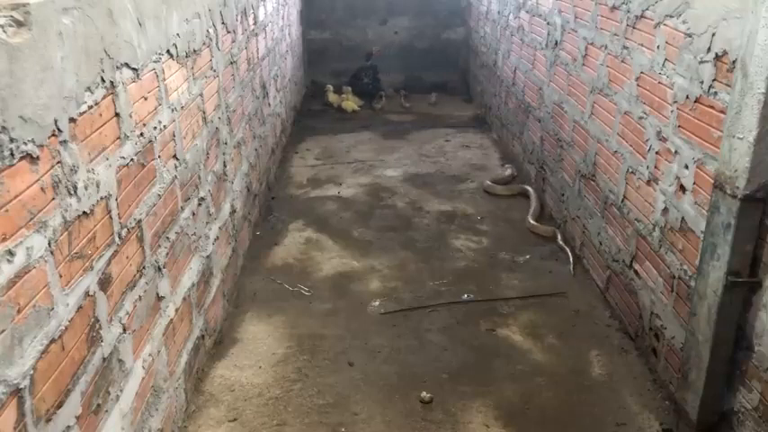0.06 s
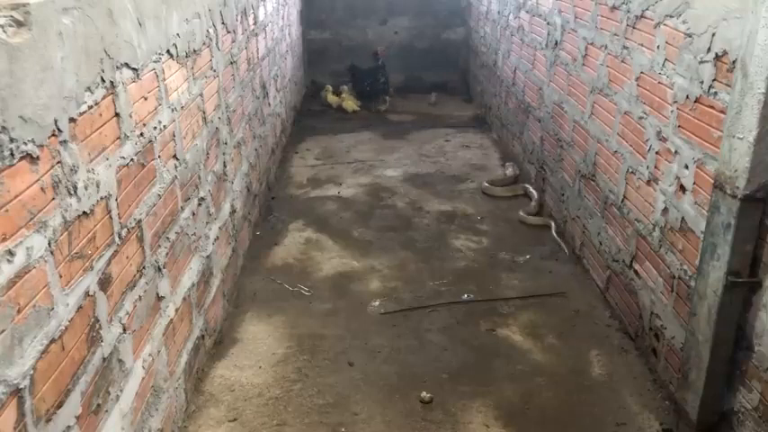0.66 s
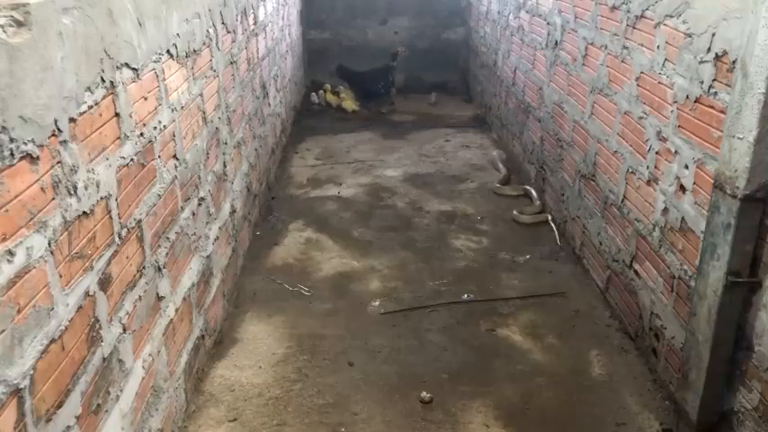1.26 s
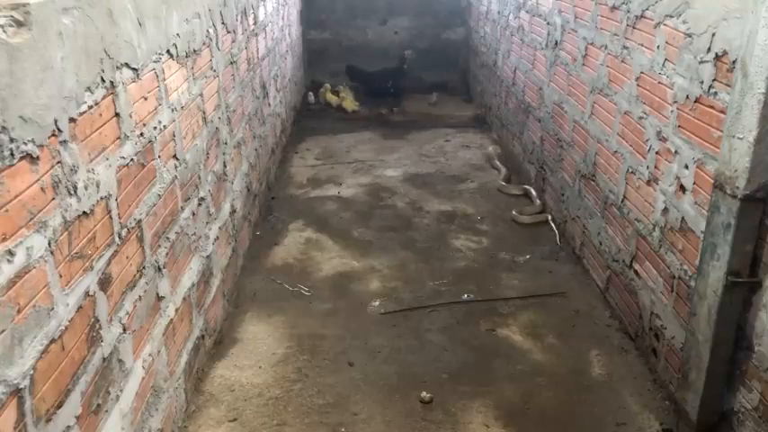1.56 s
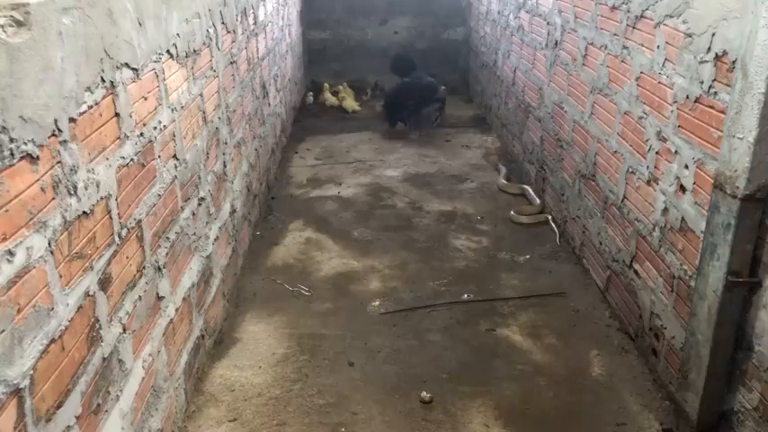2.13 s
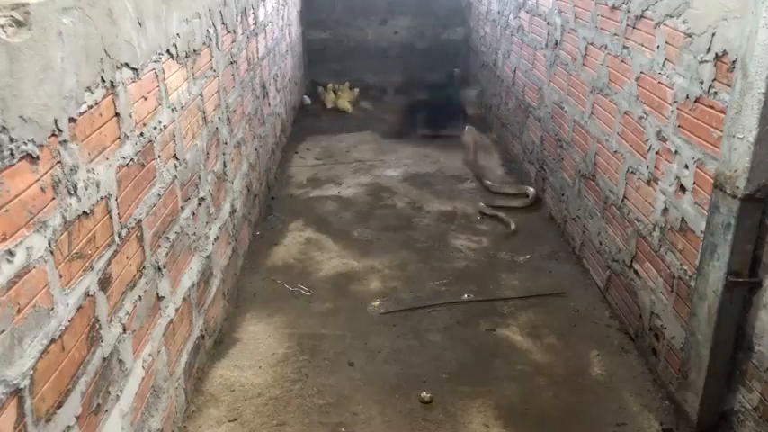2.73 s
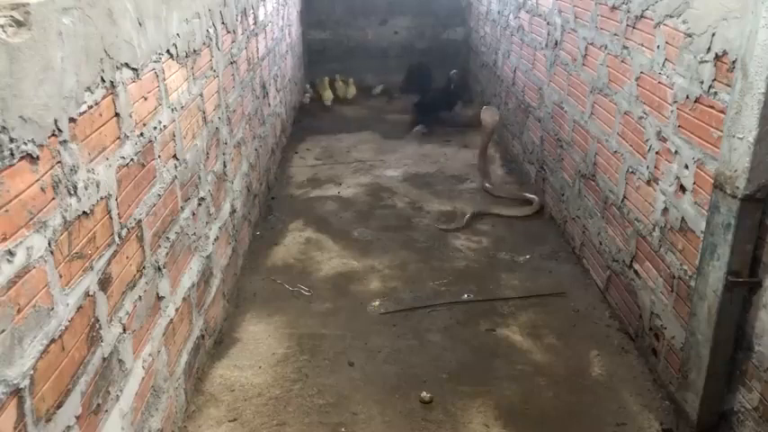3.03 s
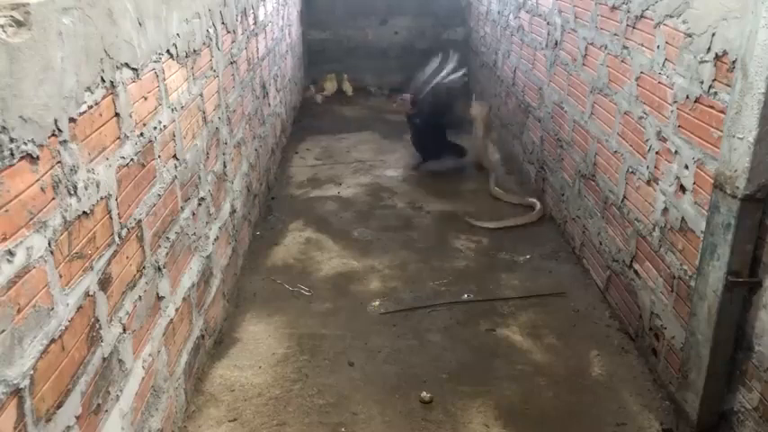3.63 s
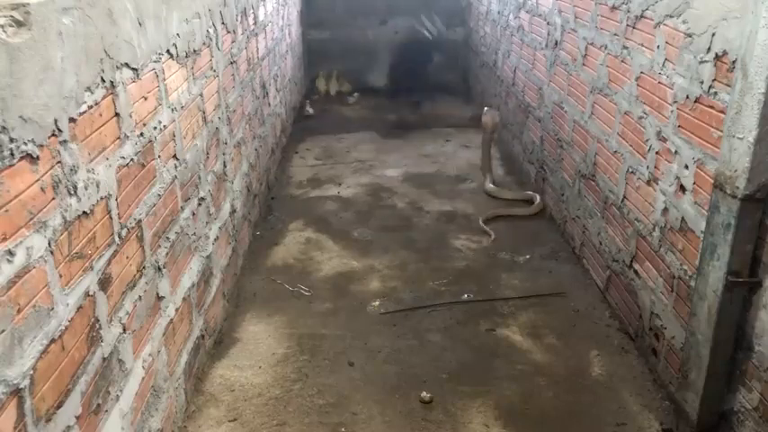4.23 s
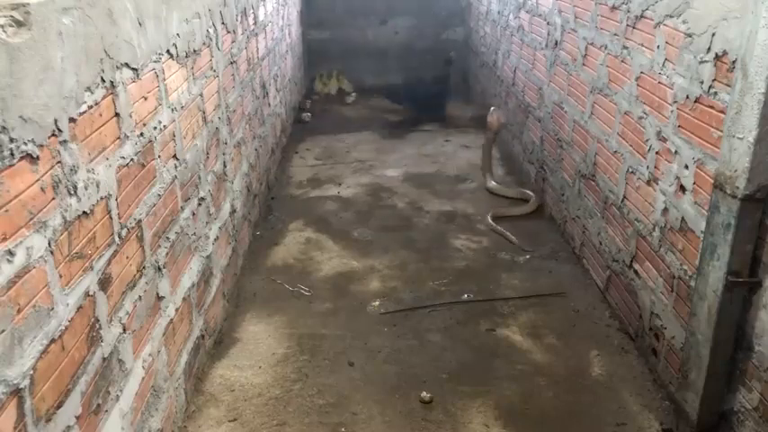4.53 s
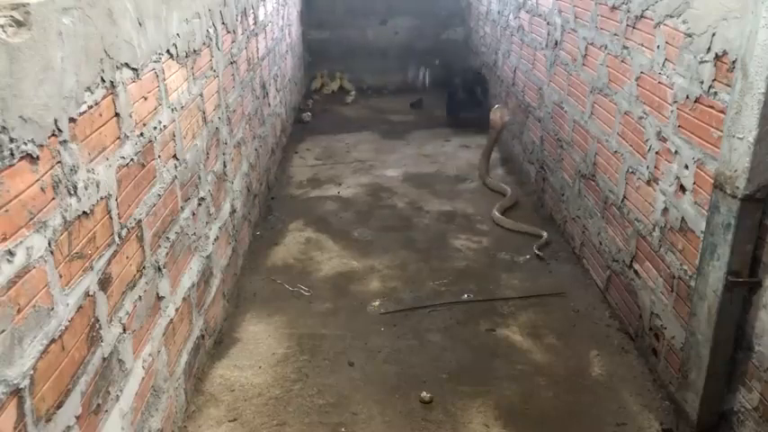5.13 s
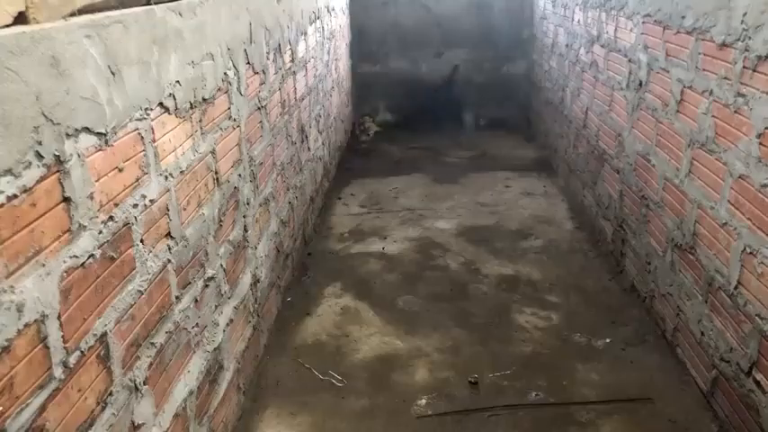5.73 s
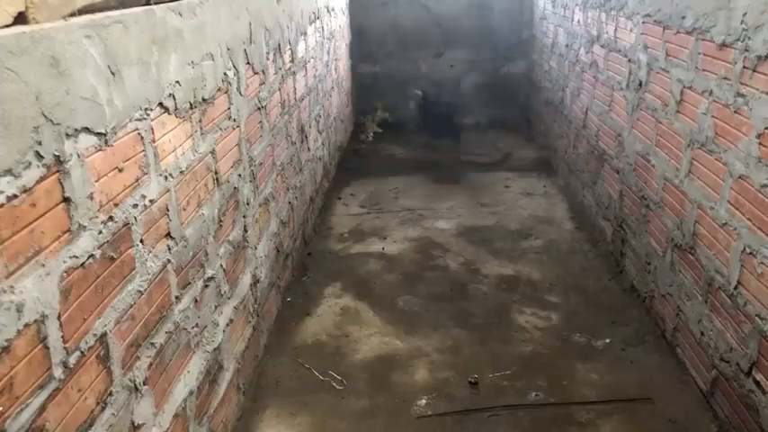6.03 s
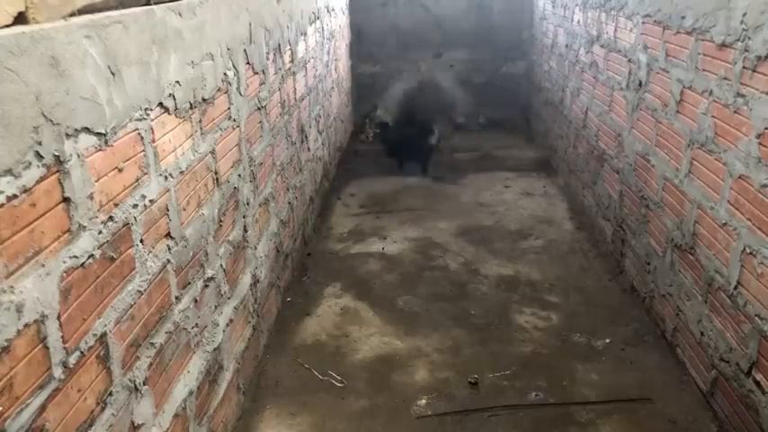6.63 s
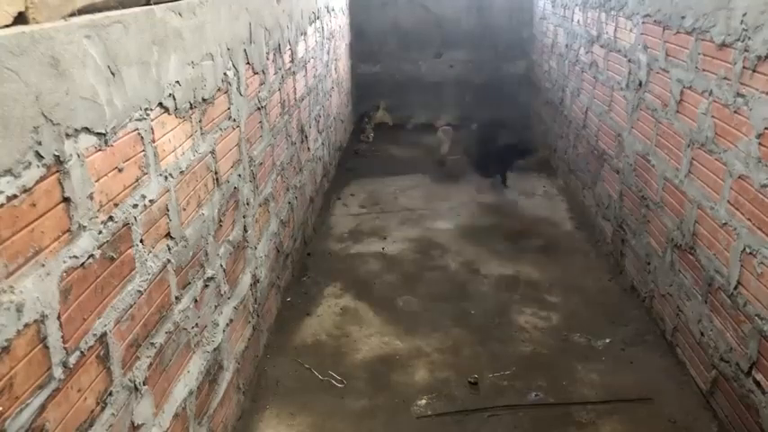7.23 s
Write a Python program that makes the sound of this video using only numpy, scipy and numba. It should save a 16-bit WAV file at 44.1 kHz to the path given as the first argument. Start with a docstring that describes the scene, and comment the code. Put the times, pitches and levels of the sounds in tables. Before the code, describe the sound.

A hen clucks softly, then cackles harshly with beating wings while chicks peep in a narrow brick pen.

```python
"""A narrow brick pen, with a hen at the far end defending her chicks against a snake.
She clucks softly among the peeping chicks, then cackles harshly, puffs from her syrinx ringing throat
and beak, and attacks with beating wings. The bare walls ring around the birds. Feathers and feet stir
on the gritty floor, and something small and hard is knocked once, close to the microphone.
Outside, an insect scrapes out steady chirps in the open air."""
import sys
import numpy as np
from scipy import signal
from scipy.fft import rfft, irfft, next_fast_len
from scipy.io import wavfile
from scipy.ndimage import uniform_filter1d
from numba import njit

SR = 44100
rng = np.random.default_rng(int(sys.argv[2]) if len(sys.argv) > 2 else 0)


def master(y):
    """Save y as 16-bit WAV."""
    cut = np.clip(np.atleast_2d(y).T, -1, 1)
    pcm = np.round(cut * 32767)  # scale
    wavfile.write(sys.argv[1], SR, pcm.astype(np.int16))


N = 321489
TIME = np.arange(N) / SR


def hen(dull_hz=3800, dull_below_db=-38, db_per_octave=7, gain_db=-.22):
    """The hen's voice from the far end: the softer the call, the duller it is."""
    out = np.zeros(N)
    for start_s, level_db, call in [*soft_clucks(), *cackles()]:
        cutoff_hz = dull_hz * 2 ** (max(level_db - dull_below_db, 0) / db_per_octave)
        add(out, start_s, from_db(level_db + gain_db) * cut(call, cutoff_hz, "low"))
    return out


def soft_clucks(base_hz=233.7, base_db=-44, hz_per_db=2.46):
    """Low calls to the chicks, beak nearly closed; the pitch rises a little with effort."""
    # clucks: start_s, length_s, level_db
    calls = [(0.076, 0.038, -59), (0.365, 0.043, -46.5), (0.608, 0.043, -47.5), (0.848, .043, -46.5),
             (1.076, 0.029, -46), (1.14, 0.022, -41.5), (1.313, 0.03, -37), (1.49, 0.039, -41),
             (1.674, .021, -40), (2.413, 0.05, -43.5), (6.131, 0.0346, -38)]
    for start_s, length_s, level_db in calls:
        pitch_hz = base_hz + hz_per_db * (level_db - base_db)
        call = cluck(length_s, pitch_hz, rough=.42, early_hz=756, late_hz=770, treble_db=-14.5,
                     chest_db=-.5, chest_hz=440, throat_width_hz=760, tone_db=-3)
        yield start_s, level_db, call


def cackles(rest_hz=1320, slide_share=.14, chest_rest_db=-13.5, chest_db_per_octave=-9.5):
    """Harsh alarm calls: the throat slides toward rest, and the wider it opens, the less chest is heard."""
    # cackles: start_s, length_s, pitch_hz, throat_hz, roughness (0-1), level_db, relative_treble_db
    calls = [(2.485, 0.042, 424, 1070, 0.8, -37, -10.5), (2.542, 0.06, 648, 1300, 0.88, -28.5, -13.5),
             (2.615, 0.065, 700, 1530, 0.62, -27, -10.5), (2.694, 0.0436, 651, 1210, 0.9, -24, -8),
             (2.753, .067, 454, 1130, .7, -22.5, -7.5), (2.825, 0.032, 465.7, 965, 0.46, -24.5, -16),
             (2.898, 0.04, 464.4, 1090, 0.4, -21.5, -10), (3.033, 0.047, 421.6, 850, 0.44, -26, -9.5),
             (3.202, 0.046, 332, 660, 0.46, -28.5, -14.5), (3.321, 0.041, 332.4, 756, 0.36, -31, -10),
             (3.441, 0.059, 372, 1175, 0.55, -27.5, -13.5), (3.615, 0.055, 647, 1140, 0.37, -20, -6),
             (3.727, 0.071, 713, 1830, 0.56, -19.5, -4.5), (3.796, .061, 706, 1510, 0.76, -19.5, -9),
             (3.936, .058, 527.6, 1266, 0.57, -17, -5.5), (4.09, 0.063, 655.2, 1210, 0.43, -18, -7.5),
             (4.243, 0.055, 354.5, 1110, 0.56, -20, -1.5), (4.385, .062, 538, 1000, 0.7, -21.5, -7),
             (4.472, .043, 620.7, 1075, 0.65, -20.5, -9), (4.62, 0.053, 559, 1010, 0.63, -23.5, -10.5),
             (4.799, 0.045, 326, 756, 0.95, -24, -9.5), (4.835, 0.041, 839, 1580, 0.52, -28.5, -12),
             (4.919, .046, 515.4, 1045, 0.8, -20.5, -6.5), (5.071, .055, 557.4, 990, 0.74, -25.5, -10),
             (5.29, 0.052, 509, 825, 0.73, -29.5, -10.5), (5.36, 0.044, 538.7, 974, 0.57, -25, -12.5),
             (5.572, 0.056, 468.6, 830, 0.65, -29, -11), (5.663, 0.055, 551.5, 984, 0.51, -24.5, -8.5),
             (5.752, 0.037, 811, 2510, 0.96, -19, -5.5), (5.831, 0.055, 720, 2230, 0.86, -23.5, -19),
             (5.941, 0.0394, 564, 1140, 0.4, -30.5, -18), (6.622, 0.04, 457.7, 906, 0.44, -27, -9.5),
             (6.757, 0.096, 674, 1920, 0.72, -17, -6), (6.914, .059, 745.4, 1485, 0.65, -14, -5.5),
             (7.058, 0.069, 661.2, 1340, 0.56, -16.5, -4.5), (7.231, 0.07, 655, 1380, 0.84, -18.5, -5)]
    for start_s, length_s, pitch_hz, throat_hz, rough, level_db, treble_db in calls:
        slide = (rest_hz / throat_hz) ** slide_share
        chest_db = chest_rest_db + chest_db_per_octave * np.log2(throat_hz / rest_hz)
        call = cluck(length_s, pitch_hz, rough, throat_hz / slide, throat_hz * slide, treble_db, chest_db)
        yield start_s, level_db, call


def cluck(length_s, pitch_hz, rough, early_hz, late_hz, treble_db, chest_db,
          chest_hz=680, chest_width_hz=300, throat_width_hz=480, tone_db=-1):
    """One call: the syrinx rings chest, beak and a throat resonance moving from early_hz to late_hz."""
    size = int((length_s + .01) * SR)
    progress = np.minimum(np.arange(size) / (length_s * SR), 1)
    push = swell(progress, rise=.38, fall=.21)
    strain = swell(progress, rise=.45, fall=.42)
    bend = (2 * progress - 1) ** 2   # 1 at the ends, 0 midway
    rough = np.clip(rough, 0, 1) * (.6 + .4 * strain)   # roughest while pressed hard
    source, cycles = syrinx(pitch_hz, rough, bend)
    source = cut(source, .5 * min(early_hz, 1150), "high", order=4)
    # the throat resonance rises and falls as the beak opens and shuts
    throat_hz = early_hz * (late_hz / early_hz) ** (2 * progress - .5) * (1.08 - .63 * bend)
    throat = glide(glide(source, throat_hz, throat_width_hz), throat_hz, 2 * throat_width_hz)
    throat = even(cut(throat, 1.58 * max(early_hz, late_hz), "low", order=5))
    # in a clear call the harmonic nearest that resonance sings out
    harmonic = round((early_hz + late_hz) / (2 * pitch_hz))
    tone = from_db(tone_db) * (1 - rough) ** 2 * np.sin(2 * np.pi * harmonic * cycles)
    chest = rms_one(resonate(source, min(chest_hz, .77 * early_hz), chest_width_hz))
    body = rms_one((throat + tone + from_db(chest_db) * chest) * push)
    # the treble needs strain, so it starts late and ends early
    treble = rms_one(beak(source, bend) * strain)
    return (body + from_db(treble_db) * treble) * np.sqrt(size / (length_s * SR))


def syrinx(pitch_hz, rough, bend, arch=.19, jitter=.14, shimmer_db=8, doubling=.53):
    """Uneven puffs and rasping air on an arched pitch; returns the sound and its running cycle count."""
    size = len(bend)
    hz = pitch_hz * (1 - arch * bend) * np.exp(jitter * rough * drift(.6 * pitch_hz, size))
    cycles = np.cumsum(hz) / SR
    puffs = np.diff(np.floor(cycles), prepend=0)
    puffs *= from_db(shimmer_db * rough * np.tanh(drift(2 * pitch_hz, size)))
    # strong and weak puffs alternate, which makes the voice hoarse
    puffs *= 1 + doubling * rough * np.cos(np.pi * cycles)
    # air rasps through the opening once a cycle
    rasp = rough * rms_one(rng.standard_normal(size) * np.cos(np.pi * cycles) ** 2)
    return rms_one(puffs) + .7 * rasp, cycles


def beak(source, bend, beak_hz=3500):
    """The bright resonances of windpipe and beak, rising as the beak opens."""
    # resonances: multiple of beak_hz, width_hz, gain_db
    modes = [(.72, 220, 3.5), (1, 239, 5.5), (1.17, 300, 1.5), (1.6, 350, -4.5), (1.92, 397, -9.5),
             (2.3, 500, -8.5), (2.75, 870, -12), (3.6, 2540, -22)]
    opening = 1.02 - .27 * bend
    ring = sum((-1) ** k * from_db(gain_db) * glide(source, ratio * beak_hz * opening, width_hz)
               for k, (ratio, width_hz, gain_db) in enumerate(modes))
    return even(cut(ring, 2530, "high", order=3))


def wings(crackle_db=2.5, thump_lag_s=.014, thud_s=.034):
    """Each stroke swishes, rubs feather on feather and shoves a puff of air; jumps and landings thud."""
    # wing beats: start_s, nominal_length_s, swish_db
    wingbeats = [(2.541, 0.079, -42), (2.597, 0.1, -32.5), (2.744, 0.065, -26.5), (2.828, 0.032, -31),
                 (3.563, 0.041, -23), (3.596, 0.035, -25), (3.672, 0.052, -21.5), (3.714, 0.075, -30.5),
                 (3.808, 0.055, -23), (4.796, 0.033, -33.5), (5.754, 0.032, -24.5), (5.831, 0.051, -24.5),
                 (5.932, 0.038, -30.5), (6.041, 0.046, -34.5), (6.085, 0.03, -38.5), (6.743, 0.12, -33.5)]
    # feathers brushing wall or floor: start_s, nominal_length_s, hiss_db
    brushes = [(2.362, 0.044, -57), (2.692, 0.049, -35), (3.231, .027, -38), (3.264, 0.049, -38),
               (3.421, 0.11, -41), (4.202, 0.032, -43), (4.857, 0.067, -35.5), (4.975, 0.029, -43),
               (5.271, 0.027, -43), (6.134, 0.026, -43), (6.209, 0.031, -44), (6.512, .041, -41.5),
               (6.559, 0.043, -40.5), (6.675, 0.052, -39)]
    # jumps and landings: start_s, level_db
    thuds = [(2.585, -41.5), (2.644, -38.5), (3.574, -30), (3.7, -40), (4.812, -40), (5.977, -35),
             (6.04, -33.5), (6.087, -30), (6.785, -39), (7.185, -36.5)]
    # wing swish: frequency_hz, density_db
    swish_spectrum = [(150, -18), (400, -3), (900, 2.5), (1500, 6), (2400, 4.5), (3500, 0.5), (5000, -6),
                      (8000, -69)]
    # feather hiss: frequency_hz, density_db
    hiss_spectrum = [(1000, -1), (2000, -9.5), (4000, 3), (7000, 5), (10000, 1.5), (15500, -4.5)]
    # air thump: frequency_hz, density_db
    thump_spectrum = [(15, -60), (30, -43), (65, -7), (95, 6.5), (140, -7.5), (300, -9.5), (600, -37)]
    # a beat is mostly swish, a brush mostly hiss
    strokes = [(start_s, length_s, db, db - 5.5, db - 16) for start_s, length_s, db in wingbeats]
    strokes += [(start_s, length_s, db - 6, db, db - 3.5) for start_s, length_s, db in brushes]
    swish, hiss, thump = np.zeros((3, N))
    for start_s, length_s, swish_db, hiss_db, thump_db in strokes:
        stroke = swell(ramp(1.147 * length_s), rise=.33, fall=.34)
        add(swish, start_s, from_db(swish_db) * stroke)
        add(hiss, start_s, from_db(hiss_db) * stroke)
        add(thump, start_s + thump_lag_s, from_db(thump_db) * stroke)
    for start_s, level_db in thuds:
        add(thump, start_s, from_db(level_db) * swell(ramp(thud_s), rise=.2, fall=.36))
    barbs = rms_one(from_db(crackle_db * drift(700, N)))
    swish *= from_db(5.5) * coloured(swish_spectrum)
    hiss *= from_db(4) * coloured(hiss_spectrum)
    thump *= from_db(4) * coloured(thump_spectrum)
    return barbs * (swish + hiss) + thump


def chicks(peep_s=.057, gain_db=6):
    """Peeps sag and plunge as the air runs out; whistles scoop up, hold with a slight dip, and dive."""
    # short falling peeps: start_s, pitch_hz, level_db
    peeps = [(.562, 4350, -57), (.716, 4430, -58), (0.841, 4400, -57), (.91, 4180, -61.5),
             (1.006, 4600, -55), (1.374, 4470, -58.5), (1.565, 4440, -57), (5.44, 3800, -54),
             (6.02, 3500, -60), (6.291, 3680, -44.5), (6.569, 3610, -45)]
    # arched whistles: start_s, length_s, top_hz, level_db
    whistles = [(0.625, .05, 4620, -64), (0.88, .065, 4750, -64), (1.13, 0.079, 5140, -55),
                (1.433, 0.2, 5260, -48), (1.763, .146, 5090, -50.5), (4.849, 0.036, 4470, -32.5)]
    out = np.zeros(N)
    for start_s, pitch_hz, level_db in peeps:
        progress = ramp(peep_s)
        sag = 1 - .25 * progress ** 1.7
        plunge = 1 - .1 * progress ** 10
        add(out, start_s, from_db(level_db) * peep(pitch_hz * sag * plunge, rise=.25, fall=.056))
    for start_s, length_s, top_hz, level_db in whistles:
        progress = ramp(length_s)
        scoop = .14 * (1 - progress) ** 10
        dip = .0404 * np.exp(-((progress - .42) / .094) ** 2)
        dive = .4 * progress ** 10
        hz = top_hz * (1 - scoop - dip - dive)
        add(out, start_s, from_db(level_db) * peep(hz, rise=.19, fall=.16))
    return from_db(gain_db) * out


def peep(hz, rise, fall, overtone_db=-24, waver=.0095):
    """A chick's nearly pure, slightly unsteady whistle along a pitch path."""
    phase = 2 * np.pi * np.cumsum(hz * (1 + waver * drift(138, len(hz)))) / SR
    tone = np.sin(phase) + from_db(overtone_db) * np.sin(2 * phase)
    return swell(np.linspace(0, 1, len(hz)), rise, fall) * tone


def knock(ring_db=-12, ring_t60_s=.23, crack_db=-10, crack_s=.045):
    """Close to the microphone, a sharp crack and the bright ring of a small hard thing."""
    # knocks: start_s, level_db
    hits = [(6.385, -17.5)]
    # the object's modes: frequency_hz, width_hz (unused), level_db
    modes = [(1907, 31, -5), (2720, 25, 3.5), (3720, 87, 1.5), (4500, 25, 3), (5700, 110, 4), (6070, 89, 0),
             (6300, 39, 0), (7700, 33, -14), (7940, 44, -4), (8910, 24, -17), (9100, 25, -19),
             (10240, 41, -22), (11300, 26, -23), (12100, 25, -20), (12300, 38, -17), (14000, 120, -22)]
    out, t = np.zeros(N), TIME[:SR // 2]
    for start_s, level_db in hits:
        partials = sum(from_db(db) * np.sin(2 * np.pi * (hz * t + rng.random())) for hz, _, db in modes)
        ring = rms_one(partials) * from_db(-60 * t / ring_t60_s)
        crack = cut(rng.standard_normal(len(t)), 1250, "high") * np.exp(-t / crack_s)
        add(out, start_s, from_db(level_db) * (from_db(ring_db) * ring + from_db(crack_db) * crack))
    return out


def rustle(grain_db=3, clump_db=7.5, tick_db=1, ticks_per_s=22, tick_s=.0097):
    """Feathers and feet on the gritty floor: clumped grains, with now and then a sharper tick."""
    # stirring between the strokes: time_s, level_db
    levels = [(2.25, -65), (2.53, -50.5), (2.64, -48), (2.85, -42), (3.06, -48.5), (3.22, -55),
              (3.43, -34.5), (3.56, -37), (3.9, -46), (4.35, -42.5), (5.0, -41), (5.3, -46.5), (5.6, -63),
              (5.78, -28), (6.04, -33.5), (6.25, -56.5), (6.57, -40.5), (7.29, -32.5)]
    # floor rustle: frequency_hz, density_db
    spectrum = [(20, -40), (50, 21), (100, 18), (400, 20), (1500, 12.5), (4000, 13), (8000, 4),
                (15500, 7.5)]
    level_db = np.interp(TIME, *np.transpose(levels), left=-120)
    grains = rms_one(from_db(grain_db * drift(1200, N) + clump_db * drift(45, N)))
    impulses = rng.random(N) < ticks_per_s / SR
    ticks = signal.lfilter([1], [1, -np.exp(-1 / (tick_s * SR))], impulses + 1e-18)
    return from_db(level_db) * (grains + from_db(tick_db) * ticks) * coloured(spectrum)


def pen(x, tail_db=-5, build_s=.0041, end_wall_s=.049, end_wall_db=-14.5, end_wall_hz=1610):
    """Direct sound, quick echoes off bare brick, a dull one off the end wall, and a darkening tail."""
    # decay of the pen: frequency_hz, t60_s
    decay = [(100, 0.43), (500, 0.44), (1200, 0.48), (4000, 0.19), (8000, 0.29), (15000, 0.23)]
    # echoes off the close walls: delay_s, gain
    echoes = [(.0021, 0.13), (.0047, 0.12), (.0093, 0.28), (.0162, .22), (.031, 0.088)]
    t = np.arange(int(.8 * SR)) / SR
    edges_hz = np.geomspace(40, 18000, 13)
    white, response = rng.standard_normal((2, len(t))), np.zeros(len(t))
    for k, (low, high) in enumerate(zip(edges_hz, edges_hz[1:])):
        t60_s = at_hz(decay, np.sqrt(low * high))
        response += cut(white[k % 2], [low, high], "band") * from_db(-60 * t / t60_s)
    response *= from_db(tail_db) * (1 - np.exp(-t / build_s)) / np.sqrt(.024 * SR)
    response[0] += 1
    for delay_s, gain in echoes:
        response[round(delay_s * SR)] += gain
    end_echo = signal.unit_impulse(len(t), round(end_wall_s * SR))
    response += from_db(end_wall_db) * cut(end_echo, end_wall_hz, "low")
    return signal.fftconvolve(x, response / np.linalg.norm(response))[:N]


def insect(level_db=-65, pitch_hz=6600, width_hz=380, period_s=.1195, scrape_hz=117):
    """Outside the pen, chirps made of quick wing scrapes on a narrow resonance."""
    chirps = np.cos(np.pi * (TIME - .335) / period_s) ** 4
    scrapes = 1 + .29 * np.cos(2 * np.pi * scrape_hz * TIME)
    tone = resonate(rng.standard_normal(N) * scrapes, pitch_hz, width_hz)
    return from_db(level_db) * rms_one(tone * (chirps + .17))


def open_air(level_db=-52):
    """A steady, low wash of outdoor noise beyond the walls."""
    # open air: frequency_hz, density_db
    spectrum = [(15, -44), (25, -12), (72, 7), (195, -10), (242, 1.5), (344, -14.5), (734, -14.5),
                (1020, -24), (1650, -15.5), (2350, -29.5), (2840, -25), (5730, -33.5), (6560, -22),
                (7920, -35), (16000, -36)]
    return from_db(level_db) * coloured(spectrum)


def from_db(db):
    """Decibels to gain."""
    return 10 ** (np.asarray(db) / 20)


def rms_one(x):
    """Scale to rms 1."""
    return x / np.sqrt(np.mean(x ** 2) + 1e-20)


def even(x):
    """Hold the level steady over a few cycles."""
    power = np.maximum(uniform_filter1d(x * x, size=330), 0)
    return x / np.sqrt(power + .02 * np.mean(x * x) + 1e-20)


def at_hz(points, hz):
    """Read a table on a log-frequency axis."""
    points_hz, values = np.transpose(points)
    return np.interp(np.log(hz), np.log(points_hz), values)


def cut(x, hz, kind, order=2):
    """Butterworth filter."""
    return signal.sosfilt(signal.butter(order, np.clip(hz, 10, .45 * SR), kind, fs=SR, output="sos"), x)


def coloured(spectrum):
    """Noise with a given spectral shape, rms 1."""
    size = next_fast_len(N)
    hz = np.maximum(np.fft.rfftfreq(size, 1 / SR), 1)
    shaped = rfft(rng.standard_normal(size)) * from_db(at_hz(spectrum, hz))
    return rms_one(irfft(shaped, size)[:N])


def drift(rate_hz, size):
    """A random wander with a spread near 1."""
    knots = rng.standard_normal(size // 10 + 2)
    return np.interp(np.arange(size) * rate_hz / SR, np.arange(len(knots)), knots)


def resonate(x, hz, width_hz):
    """Two resonances in series at one frequency, the second twice as wide."""
    for width in (width_hz, 2 * width_hz):
        r = np.exp(-np.pi * width / SR)
        poles = [1, -2 * r * np.cos(2 * np.pi * hz / SR), r * r]
        x = signal.lfilter(np.array([1, 0, -1]) * (1 - r * r) / 2, poles, x + 1e-18)
    return x


@njit
def glide(x, hz, width_hz):
    """A resonance whose centre moves."""
    r, y = np.exp(-np.pi * width_hz / SR), np.zeros(len(x))
    for i in range(2, len(x)):
        drive = (1 - r * r) / 2 * (x[i] - x[i - 2])
        y[i] = drive + 2 * r * np.cos(2 * np.pi * hz[i] / SR) * y[i - 1] - r * r * y[i - 2]
    return y


def ramp(length_s):
    """Progress from 0 to 1."""
    return np.linspace(0, 1, int(length_s * SR))


def swell(progress, rise, fall):
    """Rounded envelope; rise and fall are shares of its length."""
    return np.sin(np.pi / 2 * np.clip(np.minimum(progress / rise, (1 - progress) / fall), 0, 1)) ** 2


def add(out, start_s, x):
    """Mix a sound in at start_s."""
    at = max(round(start_s * SR), 0)
    out[at:at + len(x)] += x[:max(N - at, 0)]


def scene():
    """One microphone: birds down the ringing pen, knock and rustle dry, insect and air outside."""
    birds = hen() + wings() + chicks()
    return (pen(birds) + knock() + rustle() + insect() + open_air())[None]


def record(dry, bass_hz=38, top_hz=15900, dropout_s=(5.719, 5.742)):
    """The microphone loses the deepest bass; peaks are rounded, the sound drops out once, the top is cut."""
    rounded = .73 * np.tanh(cut(dry, bass_hz, "high", order=4) / .77)
    live = (TIME < dropout_s[0]) | (TIME > dropout_s[1])
    gate = uniform_filter1d(live.astype(float), size=64)
    return signal.sosfilt(signal.ellip(10, .1, 80, top_hz, fs=SR, output="sos"), gate * rounded)


dry = scene()
out = record(dry)
master(out)
```